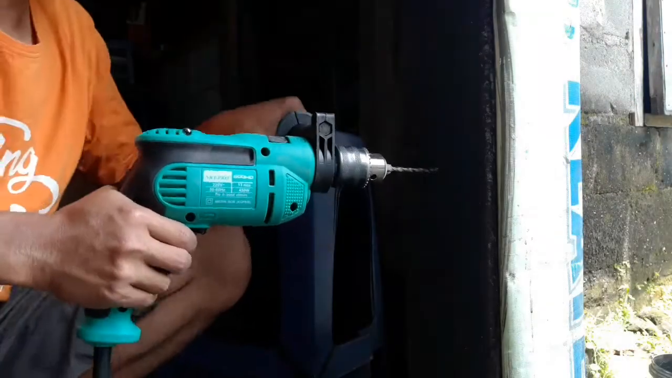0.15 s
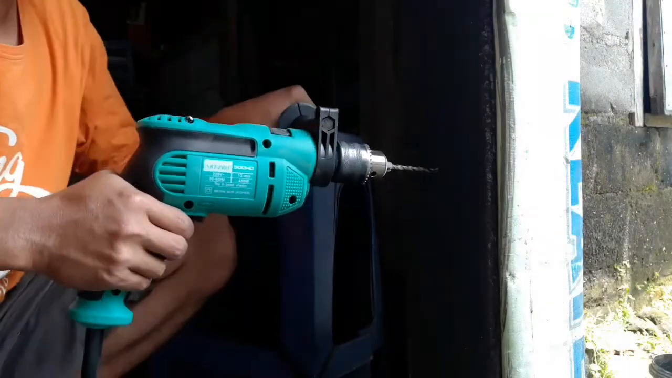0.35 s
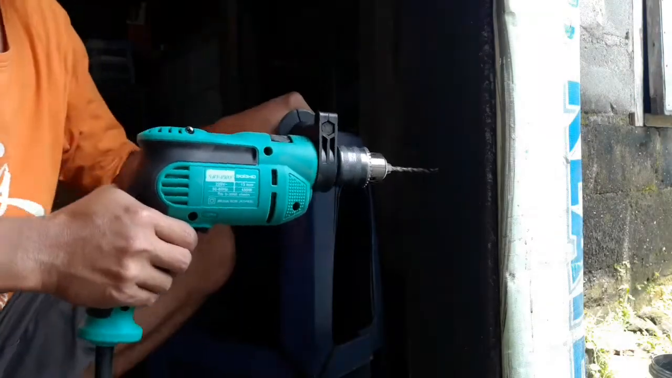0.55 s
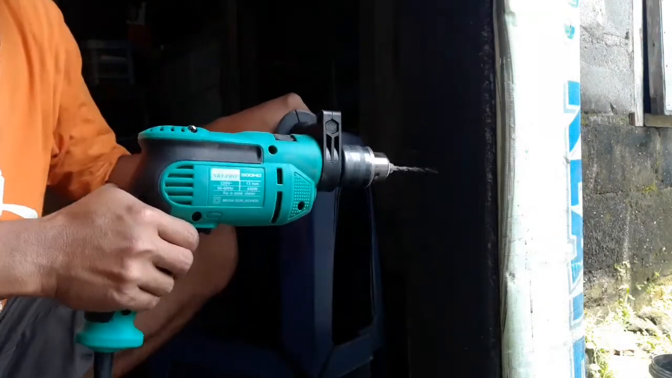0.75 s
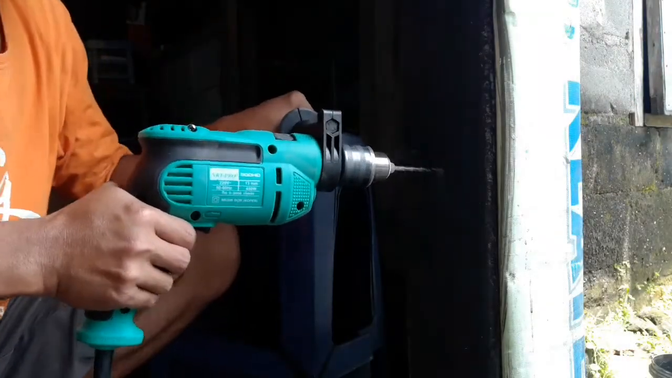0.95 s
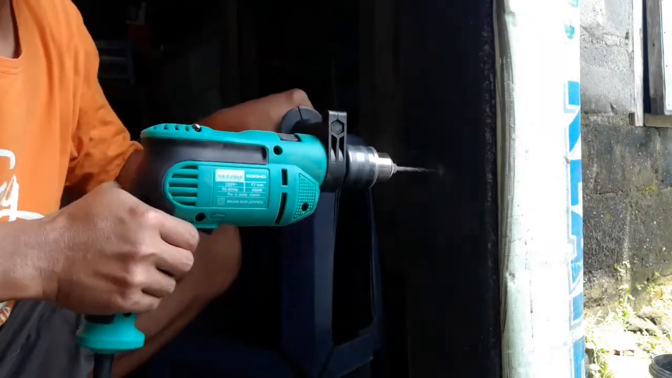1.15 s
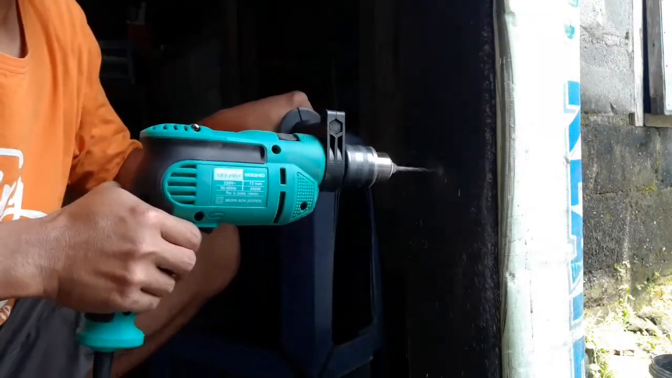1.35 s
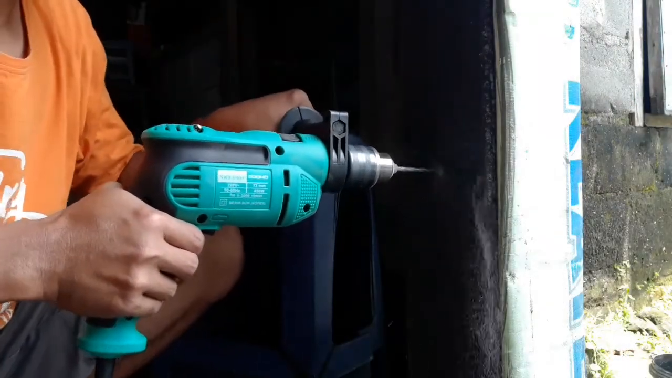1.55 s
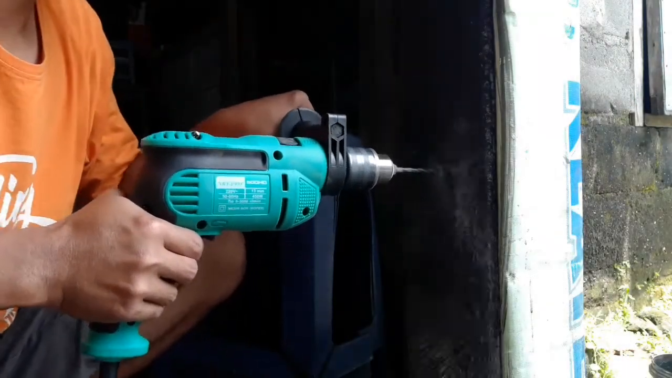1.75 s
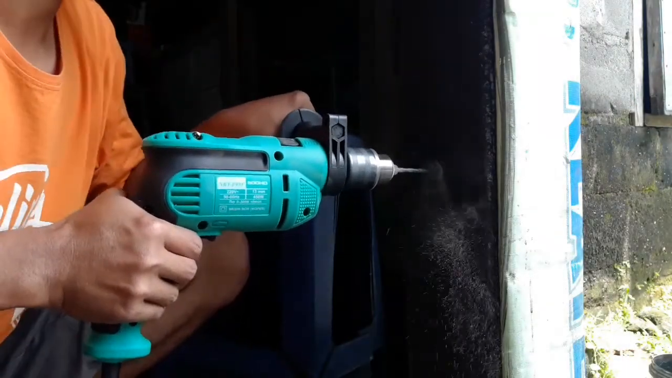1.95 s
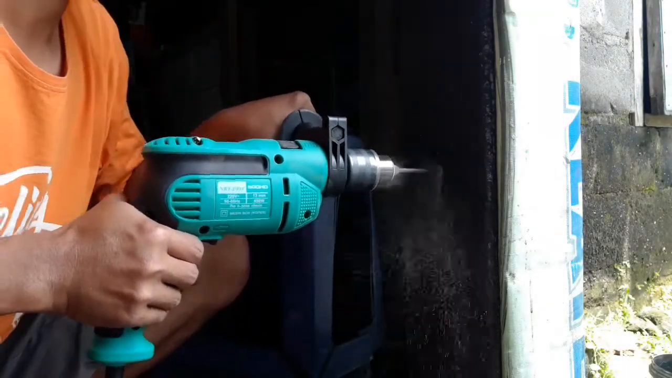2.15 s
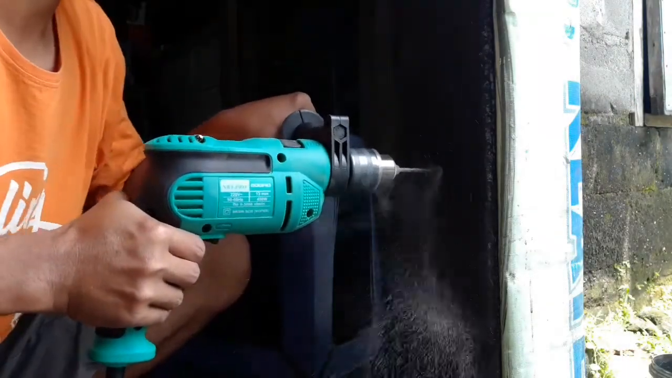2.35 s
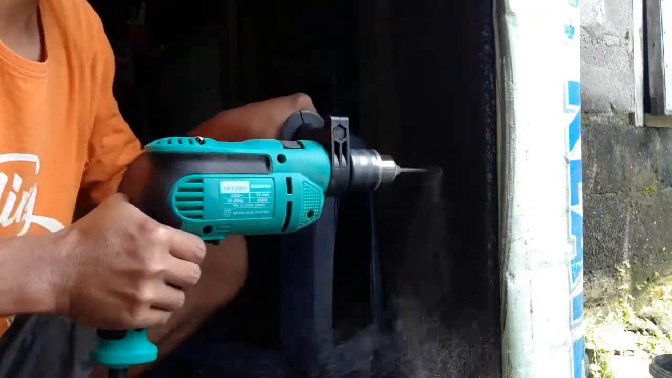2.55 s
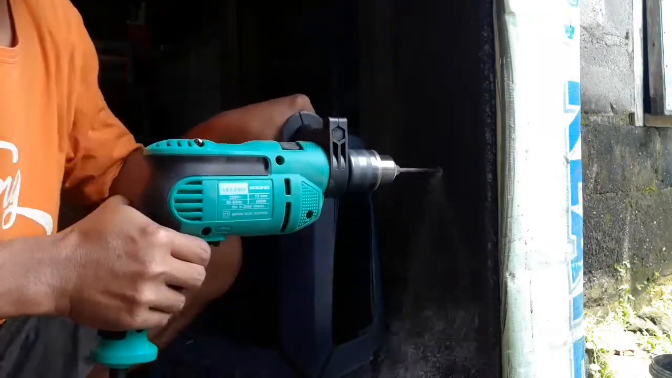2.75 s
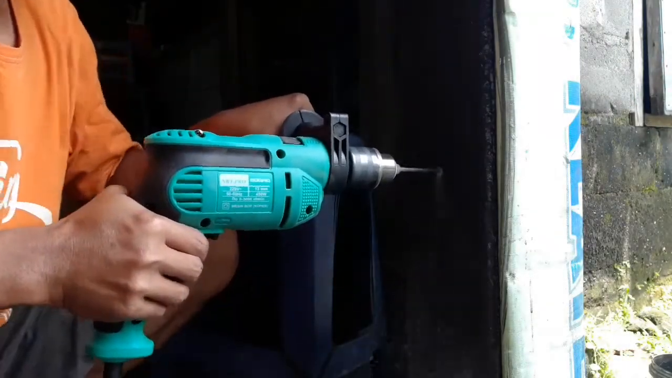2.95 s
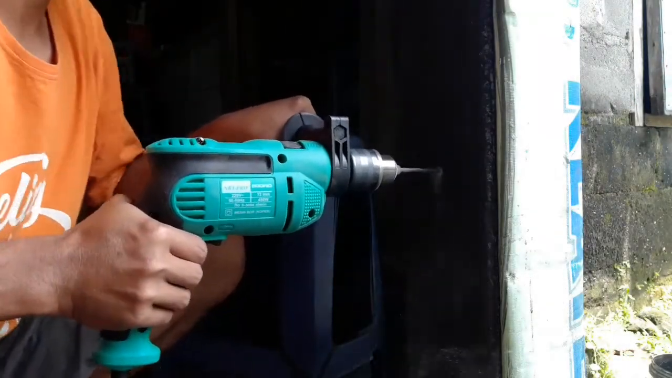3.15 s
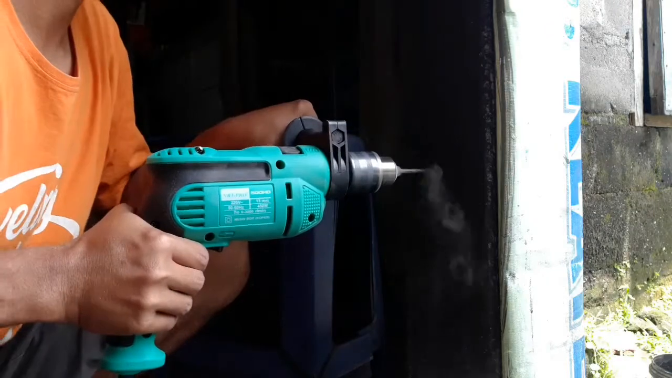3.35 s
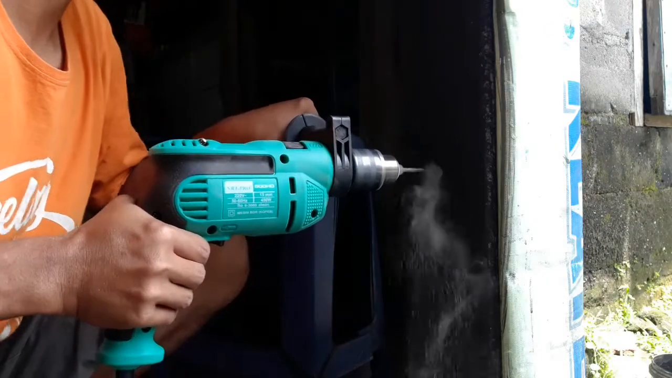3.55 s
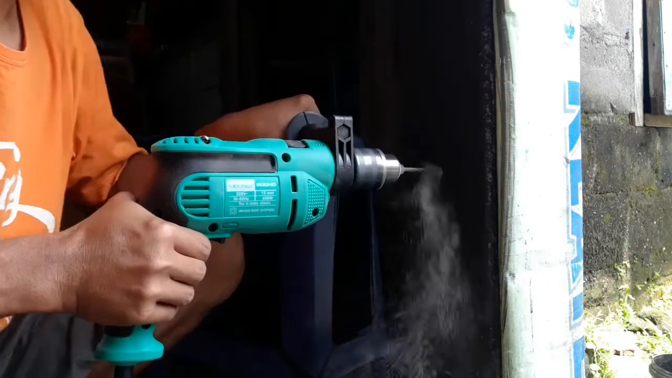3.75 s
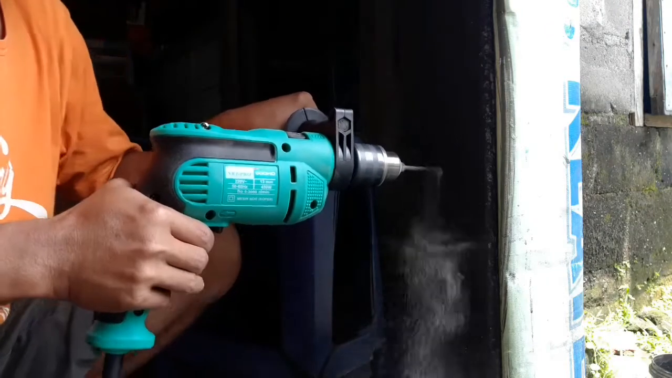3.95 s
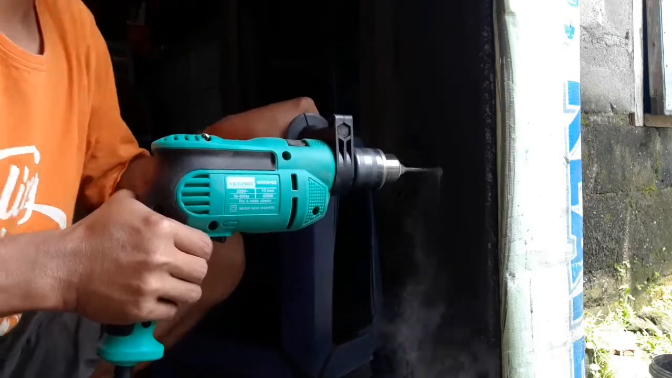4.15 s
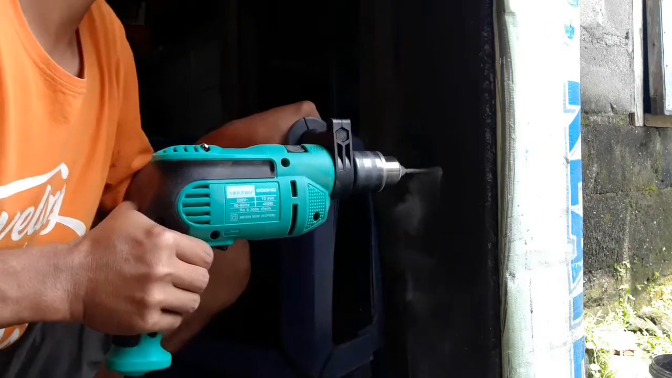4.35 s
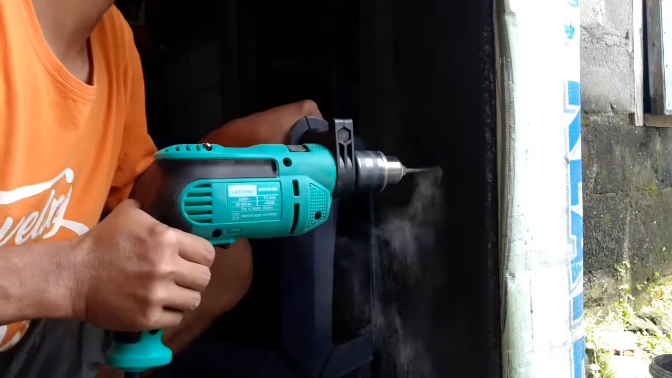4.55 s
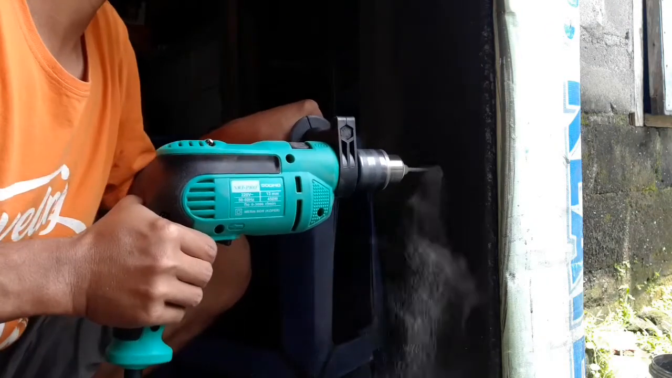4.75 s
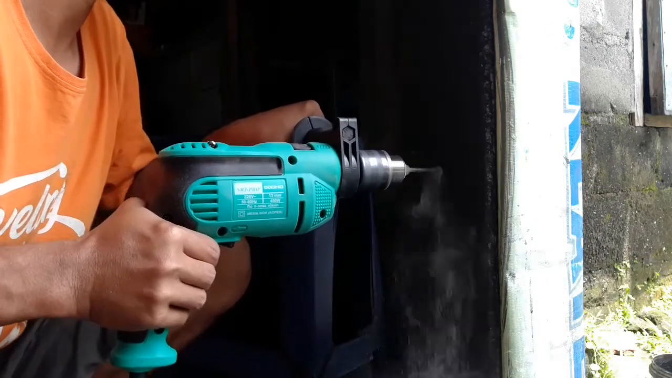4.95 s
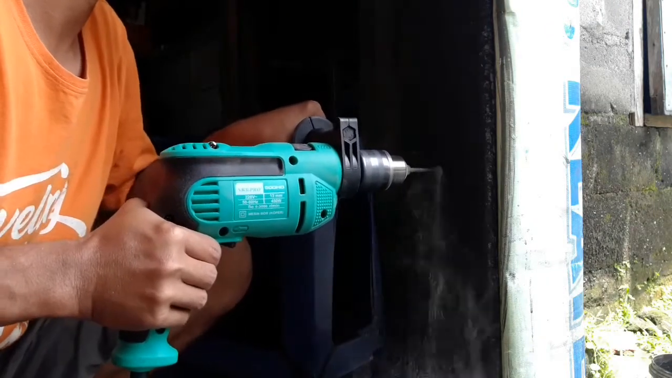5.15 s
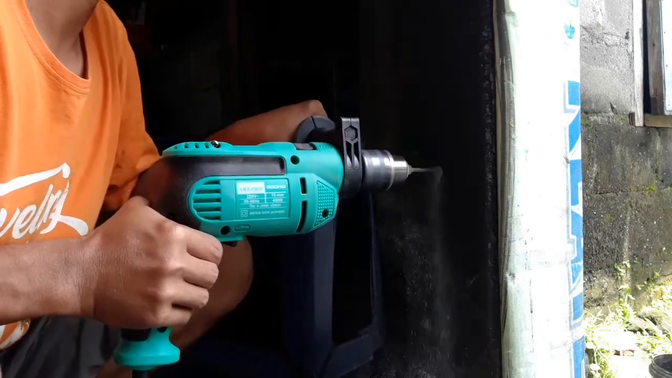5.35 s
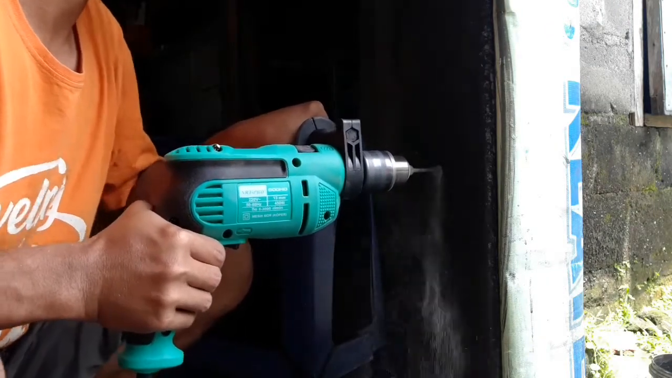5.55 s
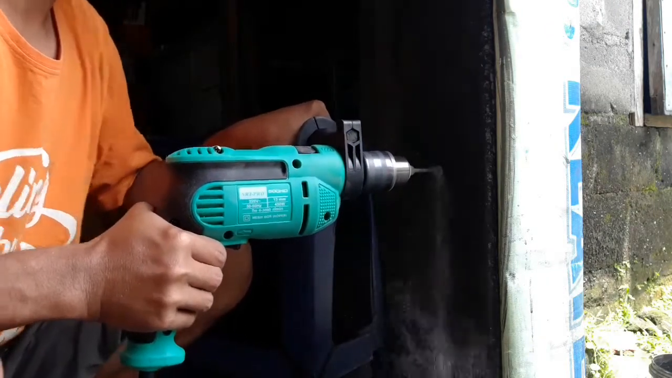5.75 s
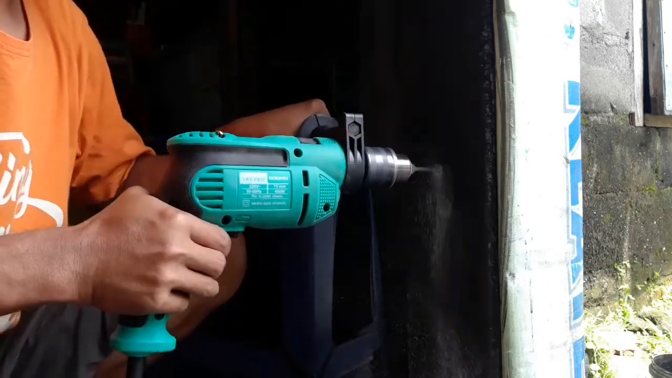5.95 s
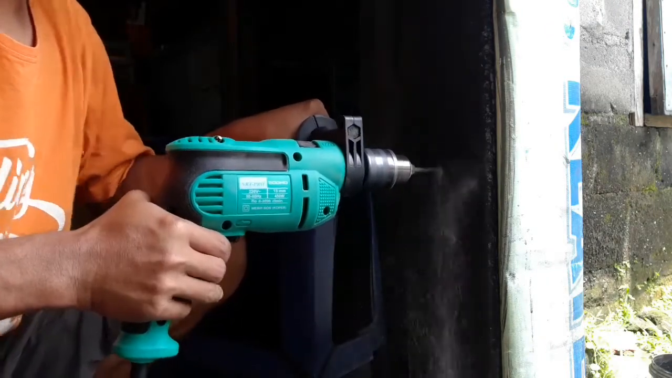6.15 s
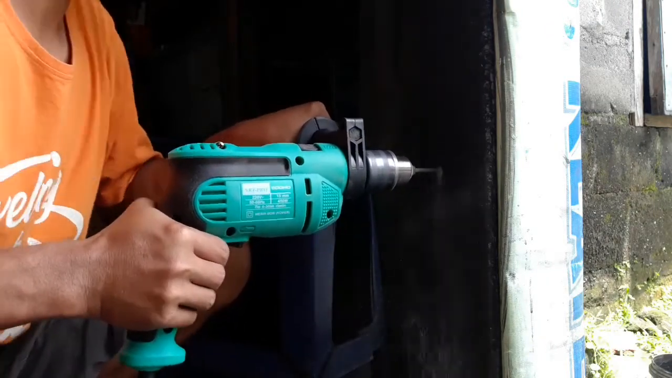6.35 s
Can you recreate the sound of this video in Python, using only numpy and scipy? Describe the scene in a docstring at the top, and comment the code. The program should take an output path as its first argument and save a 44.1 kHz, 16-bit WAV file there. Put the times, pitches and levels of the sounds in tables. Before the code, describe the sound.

Close, dry and mono, outdoors, with soft low rumble throughout. At 0 to 0.4 s the drill tip drags faintly over concrete; around 0.52 to 0.62 s it gives a cluster of light dry knocks. The motor starts at 0.75 s and from 0.85 s the bit bites with irregular hard cracks and housing thuds, rising into a dense gritty ratcheting roar. Near 1.4 s the power is released and the pitch sags while still grinding; at 1.84 s it revs again, hammering strongly until 2.8 s. The motor coasts alone, whooshing with thin falling whines. A second burst runs 3.1 to 3.9 s, steady and buzzing with bright metallic ringing. After another coasting gap, a long third burst fills 4.17 to 6.04 s, its pitch sinking slightly. The motor winds down, then a short final burst begins at 6.4 s, its power released around 6.6 s.

```python
"""Outdoors at a concrete wall: a hand-held impact drill bores in four bursts, close to a mono microphone.
A 16-tooth ratchet hammers the bit: puffs of noise, overtones and hard cracks, ringing in the drill body.
The motor is a noisy rush with thin whines; with the trigger let go it coasts and the whines fall.
Before boring the tip scrapes and taps the wall in filtered noise and short decaying tones.
Low filtered noise rumbles underneath throughout."""
import sys
import numpy as np
from scipy import signal
from scipy.io import wavfile
from scipy.ndimage import uniform_filter1d

SR = 44100
rng = np.random.default_rng(int(sys.argv[2]) if len(sys.argv) > 2 else 0)


def to_wav(s):
    """Save 16-bit WAV."""
    ch = np.atleast_2d(s).T  # columns
    pcm = np.round(np.clip(ch, -1, 1) * 32767)  # PCM
    wavfile.write(sys.argv[1], SR, pcm.astype(np.int16))


N = 285768
T = np.arange(N) / SR
TEETH = 16  # ratchet blows per spindle turn
FULL_HZ = 714  # blows per second at which the speed-dependent levels hold


def gain_of(db):
    """Amplitude factor of a level in dB."""
    return 10 ** (np.asarray(db) / 20)


def evened(x):
    """Scale a signal to rms 1."""
    return x / np.sqrt(np.mean(x ** 2) + 1e-20)


def columns(rows):
    """Each column after the time column of a table, as a curve over all samples."""
    s, *values = np.transpose(rows)
    return [np.interp(T, s, v) for v in values]


def colour(x, points):
    """Minimum-phase filter of unit energy, shaped like a spectrum of (Hz, dB) points."""
    hz = np.fft.rfftfreq(8192, 1 / SR)
    f, db = np.transpose(points)
    curve_db = np.interp(np.log(hz + 1), np.log(f), db)
    log_gain = np.log(gain_of(np.maximum(curve_db, -90)))
    mirrored = np.r_[log_gain, log_gain[-2:0:-1]]
    # the Hilbert transform of the log gain is the phase of a causal filter
    response = np.exp(np.conj(signal.hilbert(mirrored)))
    taps = np.fft.ifft(response).real[:4096]
    return signal.oaconvolve(x, taps / np.linalg.norm(taps))[:N]


def drift(hz):
    """Random wander of rms 1: noise low-passed at hz."""
    lowpass = signal.butter(2, hz, fs=SR, output="sos")
    return evened(signal.sosfilt(lowpass, rng.standard_normal(N)))


def resonate(x, hz, width):
    """A resonance of gain 1 that follows the curve hz: shift down to zero, smooth, shift back."""
    turn = np.exp(2j * np.pi * np.cumsum(hz * np.ones(len(x))) / SR)
    r = np.exp(-np.pi * width / SR)
    return 2 * (turn * signal.lfilter([1 - r], [1, -r], x / turn)).real


# how the ratchet seats, also steering the contact and the chance landings: start_s, hop (0-1 off the stone),
# first_db, second_db, third_db (overtone levels against the grinding)
SEATING_CURVE = [(.95, 0, -24, -26, -24), (1.08, .1, -26.5, -21, -23), (1.2, 0.16, -28, -10, -17),
                 (1.4, 0.18, -27, -37, -28), (1.52, 0.19, -23, -12, -14), (1.68, 0.23, -30, -15.5, -16),
                 (1.8, 0.12, -24, -30, -18), (1.92, 0.1, -21.5, -23, -25), (2.04, 0.09, -21.5, -13.5, -15),
                 (2.2, 0.14, -21.5, -11, -22), (2.3, 0.37, -21, -25, -17), (2.41, 0.11, -21, -13.5, -19),
                 (2.66, 0.04, -20.5, -10.5, -11), (2.8, 0.6, -20, -12, -22), (3.1, 0.07, -26, -11, -23),
                 (3.34, 0.05, -22, -10.5, -11.5), (3.52, 0, -26, -10.5, -9.5), (3.8, 0, -21.5, -7.5, -11.5),
                 (3.9, 0.4, -23, -11, -21), (4.2, 0.16, -23, -13, -18), (4.45, 0, -20, -11.5, -13),
                 (4.75, 0, -23, -11.5, -14.5), (5.02, 0, -20, -10.5, -8.5), (5.6, 0.14, -24, -14.5, -10),
                 (5.85, 0.06, -18, -16.5, -7.5), (6.02, .5, -30, -11.5, -18), (6.48, 0.08, -21, -16, -30)]


def grinding(press):
    """A puff of crushed stone per tooth, each of its own strength, the more so when the bit hops."""
    teeth = blows_so_far()
    hop = np.clip(columns(SEATING_CURVE)[0], 0, 1)
    luck = np.clip(rng.standard_normal(N), -2, 2)[teeth.astype(int)]
    strength_db = (1.8 + 4 * hop) * luck
    puffs = 0.67 + gain_of(strength_db) * np.exp(-(teeth % 1) / 0.16)
    puffs /= np.sqrt(uniform_filter1d(puffs ** 2, size=3000))
    wobble_db = .5 * np.sin(2 * np.pi * teeth / TEETH) + .5 * drift(330)
    return gain_of(wobble_db - 4) * bearing() * press * puffs * rng.standard_normal(N)


# uneven teeth add lines beside each overtone: overtone (number), turns_off (spindle turns per blow group)
TOOTH_LINES = [(1, -6), (1, -4), (1, -2), (1, -1), (1, 0), (1, 1), (1, 4), (1, 5), (2, -1), (2, 0), (2, 1),
               (3, -2), (3, 0), (3, 1), (3, 3), (4, -2), (4, 0), (4, 1), (5, 0)]
# one per tooth line: level_db (against its overtone, the third standing for higher ones)
TOOTH_LINE_LEVELS = [-28, -13.5, -16.5, -10.5, -1, -7, -29, -12, -51, -1.5, -9, -39, -2, -14, -11, -10.5,
                     -16, -17, -52]


def hammering(press):
    """The steady part of the blows: overtones of the ratchet, wavering and broken by the hops."""
    levels = columns(SEATING_CURVE)[1:]
    teeth = blows_so_far() + 0.0055 * drift(25)
    overtones = np.zeros(N)
    for (k, off), db in zip(TOOTH_LINES, TOOTH_LINE_LEVELS):
        level_db = levels[min(k, len(levels)) - 1] + db + 0.87 * drift(20)
        phase = (k + off / TEETH) * teeth + rng.random()
        overtones += gain_of(level_db) * np.sin(2 * np.pi * phase)
    return np.sqrt(2) * overtones * bearing() * uniform_filter1d(press, size=100)


# the loudest single blows, as the bit bites or lands from a hop:
# start_s, level_db (before the crack and thud shaping), thud_db (housing thud against the blow)
LOUD_BLOWS = [(0.8073, -16, -4), (0.8217, -5, 1), (.8327, -1, -1.5), (0.8418, -2, 0.5), (0.8472, 0.5, -9),
              (0.8551, -2, -13), (0.863, -5, -19), (0.8725, -8, -29), (.8834, -5, -17), (.894, -3, 2),
              (0.9024, -1, -1), (.911, 5, -10), (0.954, 3, -15), (0.963, -2, -20), (0.9905, 3, -12),
              (1.0296, 1, -6), (1.059, 4, -15), (1.209, 0, -17), (1.2334, -9, -22), (1.3894, -11, -7),
              (1.4377, -11, -15), (1.6864, -1, -20), (1.7017, -1, -20), (1.7193, -5, -21), (1.735, -2, -22),
              (1.764, -5, -18), (1.7907, -2, -20), (1.8196, 0, -18), (1.8793, 2.5, -16), (1.9153, 4.5, -11),
              (1.954, 6, -21), (2.2207, -3, -21), (2.305, 0, -11), (2.3293, 3, -21), (2.3409, -8, -22),
              (2.4357, -5, -14), (2.46, -1, -19), (2.527, 0, -17), (2.5602, -6, -19), (2.7362, -3, -10),
              (2.7614, -1.5, 3), (2.786, -5, -10), (3.072, 0, -10), (3.0864, -4.5, -16), (3.0976, -2, -12),
              (3.116, -4, -19), (3.1276, -4, -10), (4.1586, -0.5, -8.5), (4.171, -3, -19), (4.181, -2, -19),
              (4.236, -5.5, -19), (5.936, 1, -21), (5.947, -10, -19), (5.962, -4, -15), (6.369, -2, -22),
              (6.3837, -3, -17), (6.4, -0.5, -11), (6.417, -5, -20), (6.4274, -2, -20)]


def hard_blows(hops):
    """The loudest blows, and among them chance hard landings, the likelier the more the bit hops."""
    hard_share = 1.8  # chance of a hard landing per unit of hop
    landing_db, spread_db = 7.5, 3  # blow level over the grinding gain, and its scatter
    at = np.flatnonzero(np.diff(np.floor(hops)) > 0)
    luck, size = rng.random(N)[:len(at)], rng.standard_normal(N)[:len(at)]
    apart = abs(T[at][:, None] - np.transpose(LOUD_BLOWS)[0]).min(axis=1) > .008
    likely = luck < hard_share * columns(SEATING_CURVE)[0][at]
    pressure = bearing()[at]
    hard = likely & apart & (pressure > .01)
    db = 20 * np.log10(pressure[hard]) + landing_db + spread_db * size[hard]
    thud_db = -19  # against the blow
    return LOUD_BLOWS + [(s, blow_db, thud_db) for s, blow_db in zip(T[at][hard], db)]


def bites(blows):
    """Each hard blow is a short crack into the drill and a thud of the housing."""
    crack, thud, t = np.zeros(N + SR), np.zeros(N + SR), T[:2000]
    t60_s, thud_t60_s = 0.016, 0.073  # the thud's own decay comes on top of the blow's
    for s, db, thud_db in blows:
        onset = 1 - np.exp(-(t / 0.00084) ** 2)
        shape = 0.82 * gain_of(db - 60 * t / t60_s) * onset
        at = slice(round(s * SR), round(s * SR) + len(t))
        crack[at] += 0.44 * shape * rng.standard_normal(len(t))
        tone = np.sin(2 * np.pi * rng.uniform(1080, 1620) * t)  # a housing pitch of its own
        thud[at] += gain_of(thud_db - 60 * t / thud_t60_s) * shape * tone
    return crack[:N], thud[:N]


def hop_clock():
    """Hops of the two-edged bit since the start, two a turn, unevenly spaced."""
    return 2 * blows_so_far() / TEETH + 0.25 * drift(7.1)


def contact(hops, blows):
    """The two-edged bit hops twice a turn: rounded lumps of pressure with gaps between; rms about 1."""
    bounce = np.clip(columns(SEATING_CURVE)[0], 0, 1)
    lumps = np.sin(np.pi * (hops % 1) ** .7) ** 2.5 * gain_of(2.5 * drift(50))
    press = (1 - bounce) + 2 * bounce * lumps
    for s, *_ in blows:  # the pressure dips as the bit lifts just before each hard landing
        near = slice(round(s * SR) - 600, round(s * SR) + 600)
        press[near] *= 1 - .6 * np.exp(-((T[near] - s + .003) / .0022) ** 2)
    return press / np.sqrt(uniform_filter1d(press ** 2, size=3000))


# the bit is pressed on the wall: touch_s, lift_s, level_db (held, at full speed, before the grinding's trim),
# lean_s (lean-in time constant), ease_s (ease-off time constant)
BORING_BURSTS = [(0.849, 2.806, -11, 0.019, 0.036), (3.089, 3.904, -11, 0.047, 0.037),
                 (4.165, 6.042, -11.5, 0.059, 0.046), (6.405, 6.69, -12.5, .03, 0.041)]


def bearing():
    """Grinding gain: the hand leans in, holds and eases off; faster is louder."""
    lean_db, ease_db = -11.5, -17.5  # at the touch and at the lift, against the hold
    unpowered_db, db_per_octave = -2.5, 1.5  # with the trigger let go; per doubling of speed
    out = np.zeros(N)
    for touch, lift, db, lean_s, ease_s in BORING_BURSTS:
        at = slice(round(touch * SR), round(lift * SR))
        lean = lean_db * np.exp((touch - T[at]) / lean_s)
        ease = ease_db * np.exp((T[at] - lift) / ease_s)
        out[at] = gain_of(db + lean + ease)
    squeezed = sum((T >= on) & (T < off) for on, off, *_ in TRIGGER_SQUEEZES)
    idle = uniform_filter1d(1. - squeezed, size=2000)
    speed_db = db_per_octave * np.log2(speed() / FULL_HZ)
    return uniform_filter1d(out, size=300) * gain_of(unpowered_db * idle + speed_db)


# the trigger is squeezed: on_s, off_s, blows_hz (the run-up's goal), run_up_s (time constant),
# creep_hz_per_s, ease_hz (speed gained by the release, as the bit eases off)
TRIGGER_SQUEEZES = [(.751, 1.415, 752, .273, 0, 0), (1.84, 1.92, 490, .1, 0, 0),
                    (1.92, 2.8, 700, .18, 0, 0), (3.09, 3.91, 668, .115, 10, 42),
                    (4.18, 6.015, 686, .2, -14, 8), (6.385, 6.6, 684, .2, 0, 0)]


def speed():
    """Blows per second: each squeeze runs up to a settled speed, each release coasts down."""
    rest_hz, ease_s = 60, .065
    coast_hz, coast_s = 160, .816  # let go, the speed sinks toward coast_hz
    hz = np.full(N, 1. * rest_hz)
    for on, off, top_hz, up_s, creep_hz, ease_hz in TRIGGER_SQUEEZES:
        at = round(on * SR)
        held = np.minimum(T[at:], off) - on
        run_up = (top_hz - hz[at]) * np.exp(-held / up_s)
        eased = ease_hz * np.exp((held + on - off) / ease_s)
        driven = top_hz + creep_hz * held - run_up + eased
        released = np.maximum(T[at:] - off, 0)
        hz[at:] = coast_hz + (driven - coast_hz) * np.exp(-released / coast_s)
    return uniform_filter1d(hz, size=1000)


def blows_so_far():
    """Ratchet teeth passed since the start: the speed summed over time."""
    return np.cumsum(speed()) / SR


# spectrum of drill body and wall: freq_hz, level_db (relative, per Hz)
STONE_SPECTRUM = [(150, -59), (250, -44), (500, -20), (1000, -17), (1700, -12), (3000, -5.5), (6000, -6.5),
                  (8500, -2), (9800, -9.5), (10500, -16.5), (13000, -16.5), (15600, -23)]
# what bit, chuck and housing ring with, before the spectrum above:
# pitch_hz, width_hz, shallow_db (shallow hole), deep_db (deep hole)
BODY_RINGS = [(454, 13.6, 16, 9), (881, 44, 14.5, 9.5), (1270, 280, 14.5, 3), (1903, 81, 0, 5),
              (2390, 180, -11, -13), (2850, 75, -13, -2.5), (3008, 30, 14.5, -10.5), (3470, 110, 2.5, -1.5),
              (3620, 210, -4.5, 4.5), (4058, 83, 2.5, 1.5), (4650, 220, -54, -3), (5495, 30, 1, 5.5),
              (5830, 220, -21, -5.5), (7010, 24, -22, 8), (7060, 36, -27, -12), (8040, 17, 7, 5),
              (8730, 86, 1, 3.5), (9280, 170, -22, 2.5), (10030, 120, -58, 6.5), (11100, 110, -13, 4),
              (11900, 57, -27, 5), (13700, 120, -11, 6)]


def drill_body(force):
    """The force passes the body; rings are struck unevenly, wander with the grip, change with depth."""
    half_deep_s = 1.83
    deep = 1 / (1 + np.exp(-(T - half_deep_s) / .5))
    rings = np.zeros(N)
    for hz, width, shallow_db, deep_db in BODY_RINGS:
        level_db = shallow_db + (deep_db - shallow_db) * deep + 1.16 * drift(39)
        rings += resonate(force * gain_of(level_db), hz * (1 + .008 * drift(3)), width)
    return colour(force + rings, STONE_SPECTRUM)


# spectrum of fan, brushes and gears: freq_hz, level_db (relative, per Hz)
MOTOR_SPECTRUM = [(150, -51), (250, -16.5), (324, -26), (359, -13.5), (564, -14.5), (718, -8.5),
                  (980, -8.5), (1480, 2), (2410, -8), (3410, -3.5), (5070, -5), (6800, -3.5), (9130, -5.5),
                  (10500, -13.5), (15600, -17)]
# the whines: multiple (of the motor's turning rate)
WHINE_MULTIPLES = [1, 2, 24, 34, 48]
# one per whine: level_db (before the housing rings and the fade at low speed)
WHINE_LEVELS = [-56, -50, -40, -45, -37]


def motor():
    """Air and brush noise, lumpy with gear chatter, and thin whines tied to the speed."""
    rush_db, rush_db_per_octave = -22.5, 8  # at full speed; per doubling of speed
    motor_turns_per_blow = .606
    speed_hz = speed()
    running = np.clip((speed_hz - 60) / 420, 0, 1) ** 0.32  # silent at the resting speed
    chatter = gain_of(0.61 * drift(170)) * rng.standard_normal(N)
    rings = np.zeros(N)
    for hz, width, *_ in BODY_RINGS:
        rings += resonate(chatter * gain_of(-8.0 + 4.5 * drift(27)), hz, width)
    rush = evened(colour(chatter + rings, MOTOR_SPECTRUM))
    rush_gain = gain_of(rush_db + rush_db_per_octave * np.log2(speed_hz / FULL_HZ))
    turns = motor_turns_per_blow * (blows_so_far() + 0.0034 * drift(40))
    whines = [gain_of(db + drift(15)) * np.sin(2 * np.pi * k * turns)
              for k, db in zip(WHINE_MULTIPLES, WHINE_LEVELS)]
    whines[2] = resonate(whines[2], 9100, 1100)  # these two are loud only as they cross a housing ring
    whines[3] = resonate(whines[3], 12200, 900)
    whine_gain = np.sqrt(2) * np.minimum(speed_hz / 480, 1) ** 4
    return running * (rush_gain * rush + whine_gain * sum(whines))


# the bit drags over the wall: start_s, length_s, level_db, peak_share (of the length until the loudest moment)
DRAG_STROKES = [(0.023, 0.14, -39, 0.61), (.15, 0.11, -53, .5), (.25, .13, -58.5, 0.54),
                (0.575, .18, -46, 0.28), (.74, 0.12, -34, 0.65)]


def dragging():
    """Gain of the tip on the wall: a faint rest until the boring starts, and rounded strokes."""
    resting_db = -59.5
    out = gain_of(resting_db) * (T < BORING_BURSTS[0][0])
    for start, length, db, share in DRAG_STROKES:
        skew = np.log(.5) / np.log(np.clip(share, .1, .9))
        u = np.clip((T - start) / length, 0, 1) ** skew
        out = out + gain_of(db) * np.sin(np.pi * u) ** 1.03
    return out


# spectrum of the dragging tip: freq_hz, level_db (relative, per Hz)
GRIT_SPECTRUM = [(350, -33), (600, -12), (726, -7), (1050, -5), (2050, -7.5), (3210, -3), (6260, -7.5),
                 (6980, -6), (7570, -5), (9500, -6.5), (10300, -16), (15600, -21)]
# the bit taps the wall: start_s, level_db (before the onset), pitch_hz (of the knock), t60_s (of the grit)
WALL_TAPS = [(0.045, -34, 7190, 0.025), (0.071, -41, 3840, 0.025), (0.5222, -42, 1410, 0.025),
             (0.564, -25.5, 3660, 0.036), (0.5831, -39, 6340, 0.03), (0.596, -13.5, 1420, 0.02),
             (0.6055, -24, 1230, 0.033), (0.623, -20.5, 1380, 0.03)]


def handling():
    """Gritty drag of the tip; each tap is a dry knock of three decaying tones with a little grit."""
    grains = rng.standard_normal(N) * gain_of(1.6 * drift(300))
    out = dragging() * evened(colour(grains, GRIT_SPECTRUM))
    t = T[:2000]
    onset = 1 - np.exp(-(t / 0.00057) ** 2)
    for s, db, hz, t60 in WALL_TAPS:
        knock = np.sin(2 * np.pi * hz * t)
        knock += 0.51 * np.sin(2 * np.pi * 2800 * t) + .5 * np.sin(2 * np.pi * 1950 * t)
        noise = evened(resonate(rng.standard_normal(len(t)), 2900, 2500))
        grit = gain_of(-60 * t / max(t60, .004)) * noise
        at = slice(round(s * SR), round(s * SR) + len(t))
        out[at] += gain_of(db) * onset * (gain_of(-60 * t / .012) * knock + 0.34 * grit)
    return out


# base level of the rumble: start_s, level_db
RUMBLE_LEVEL = [(0, -45), (.79, -48.5), (1.0, -48.5), (2.1, -52), (3.3, -52), (4.3, -54.5), (5.1, -48),
                (5.8, -48), (6.48, -50.5)]
# gusts swelling on top of it: peak_s, level_db (added as gain), half_width_s (to 1/e)
RUMBLE_GUSTS = [(.89, -37.5, .05), (2.33, -44, 0.078), (4.42, -44, 0.033), (4.85, -52, .03),
                (5.801, -47, 0.044)]
# spectrum of the rumble: freq_hz, level_db (relative, per Hz)
RUMBLE_SPECTRUM = [(15, -67), (25, -25), (128, -0.5), (161, -2.5), (289, -6), (318, -6.5), (339, -18),
                   (380, -7), (412, -7), (1200, -30), (1560, -71), (2640, -120)]


def rumble():
    """Lumpy low noise of the air outdoors, with one booming pitch."""
    air = rng.standard_normal(N)
    low = colour(air + 1.24 * resonate(air, 166, 10), RUMBLE_SPECTRUM)
    level = gain_of(columns(RUMBLE_LEVEL)[0])
    for s, db, width in RUMBLE_GUSTS:
        level = level + gain_of(db) * np.exp(-((T - s) / width) ** 2)
    return level * gain_of(1.8 * drift(16)) * evened(low)


def scene():
    """All sources reach one microphone that feeds both channels."""
    hops = hop_clock()
    blows = hard_blows(hops)
    press = contact(hops, blows)
    crack, thud = bites(blows)
    body = drill_body(grinding(press) + crack)
    drill = body + hammering(press) + thud + motor()
    return np.tile(drill + handling() + rumble(), (2, 1))


def record(dry):
    """The highest peaks round off toward 0.9; the microphone drops the deep bass; then the band limit."""
    rounded = dry / (1 + abs(dry / 0.9) ** 5) ** (1 / 5)
    thin = signal.sosfilt(signal.butter(3, 60, "high", fs=SR, output="sos"), rounded)
    edge_hz = 15520
    band = signal.firwin(1535, edge_hz, window=("kaiser", 10), fs=SR)
    return signal.oaconvolve(thin, band[None], "same")


dry = scene()
out = record(dry)
to_wav(out)
```